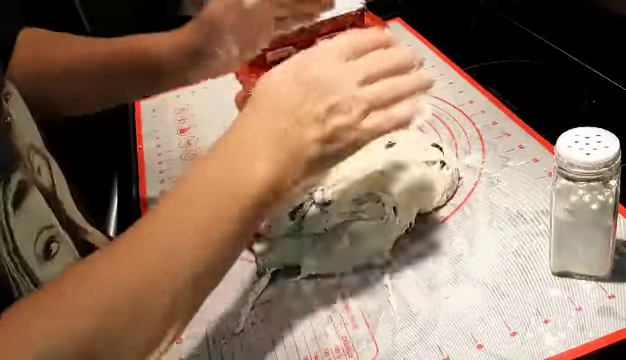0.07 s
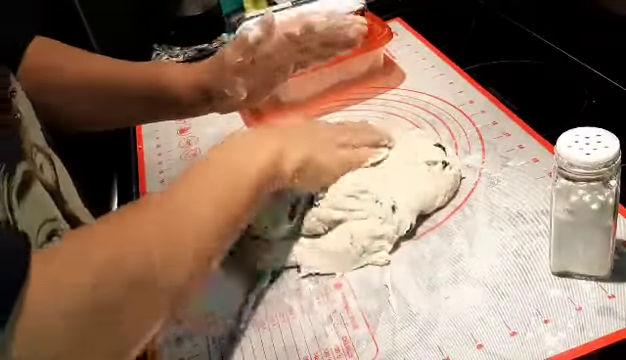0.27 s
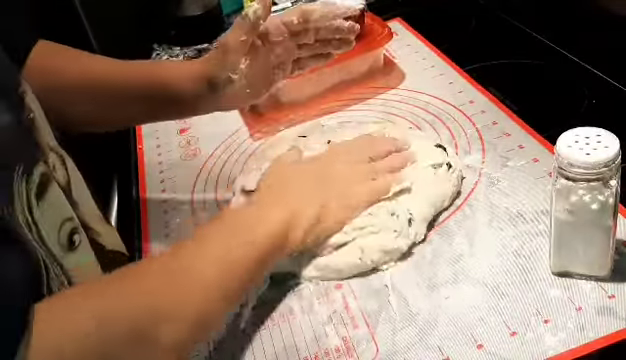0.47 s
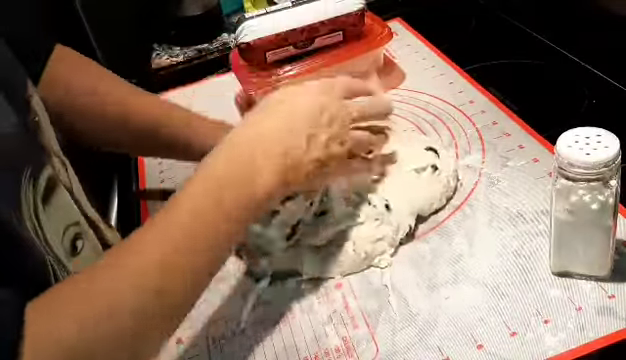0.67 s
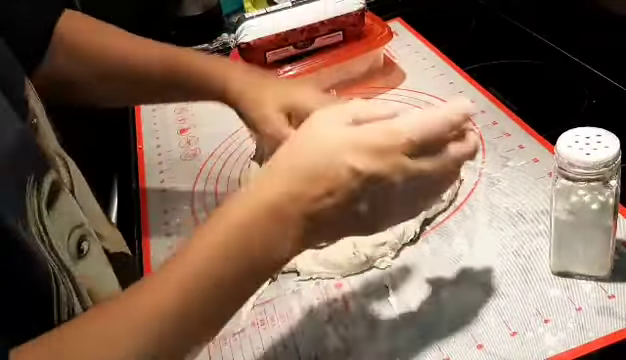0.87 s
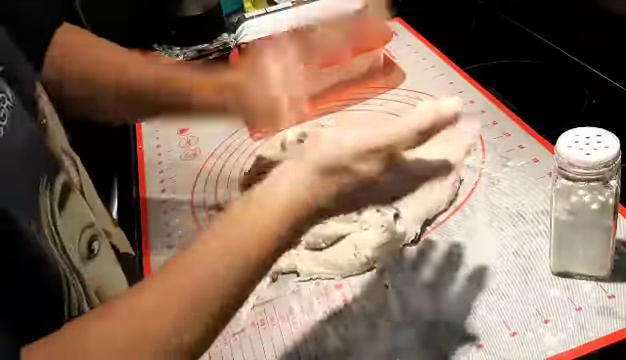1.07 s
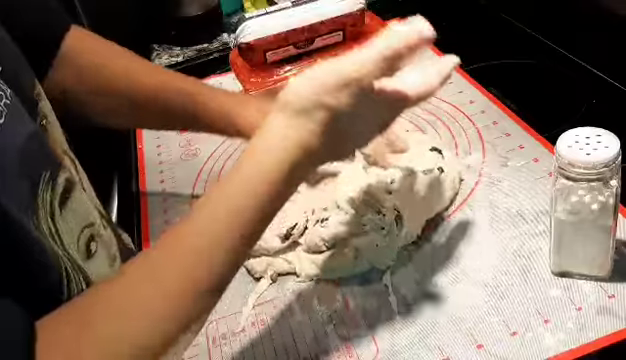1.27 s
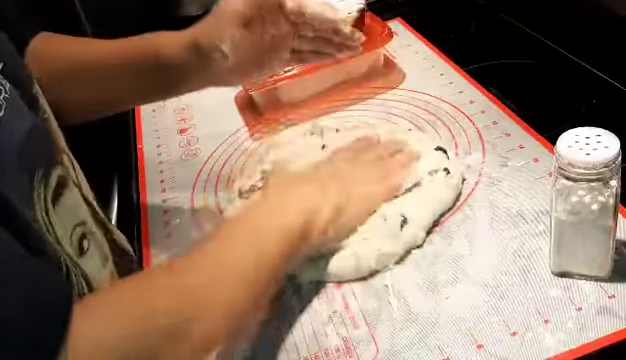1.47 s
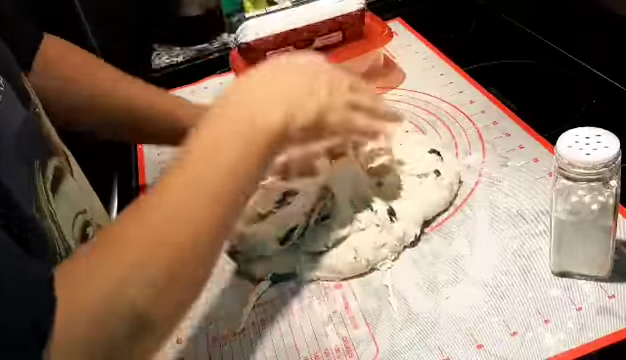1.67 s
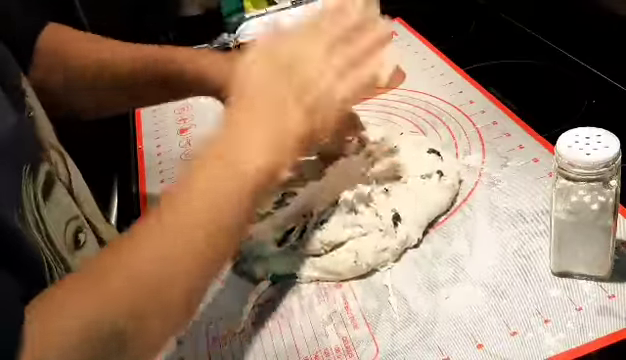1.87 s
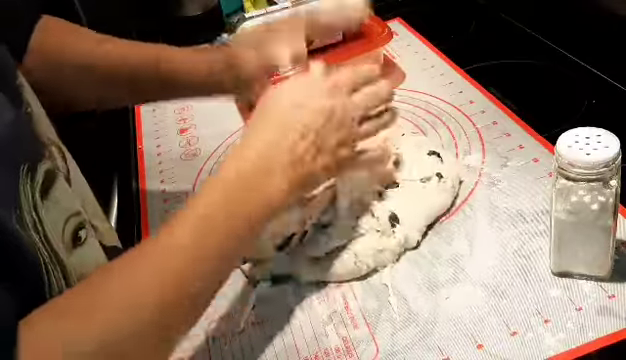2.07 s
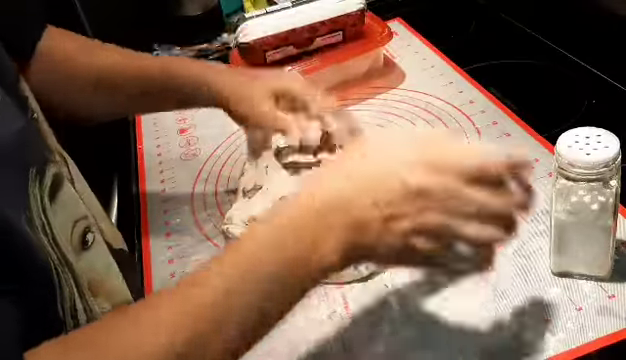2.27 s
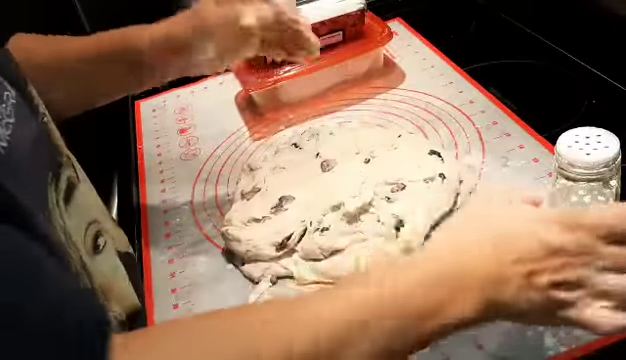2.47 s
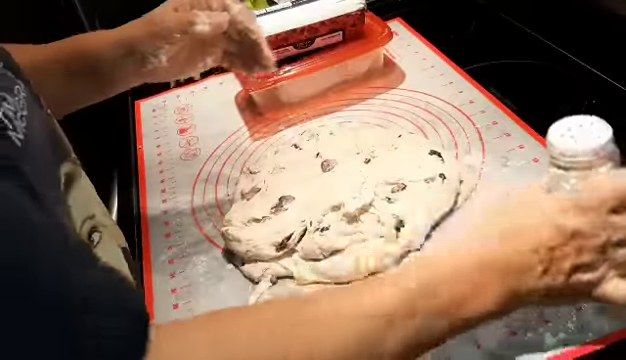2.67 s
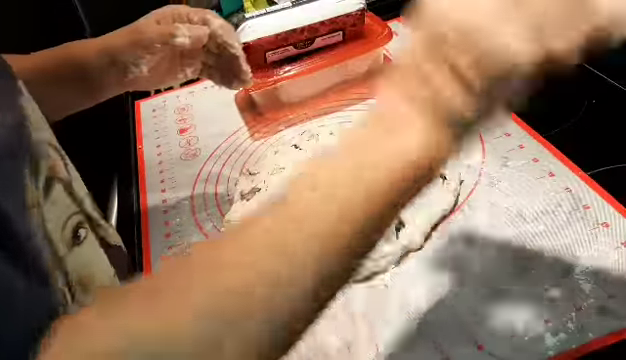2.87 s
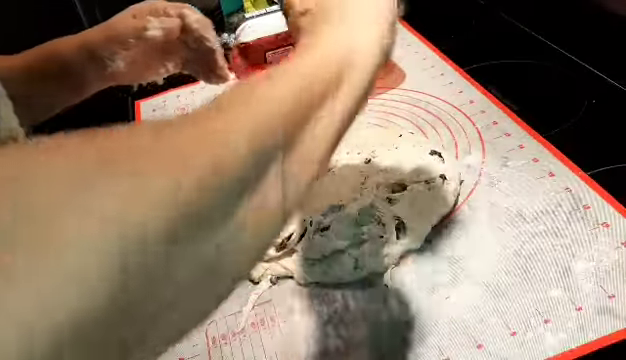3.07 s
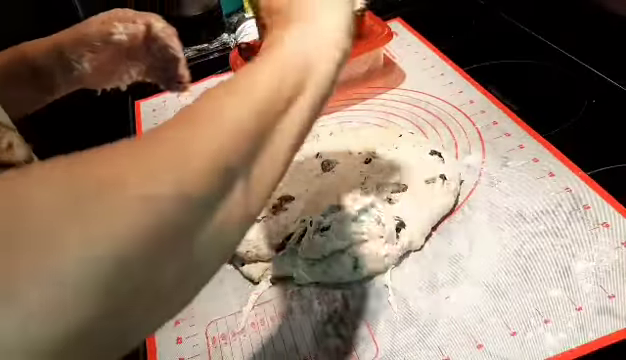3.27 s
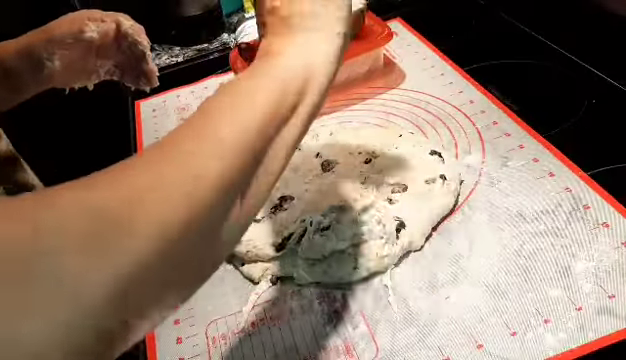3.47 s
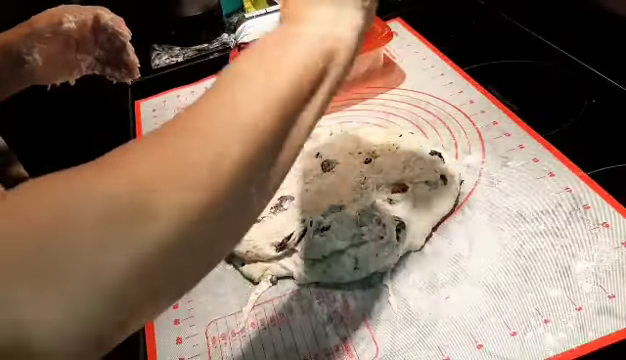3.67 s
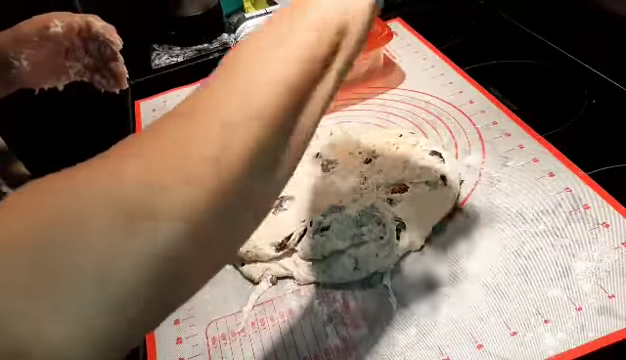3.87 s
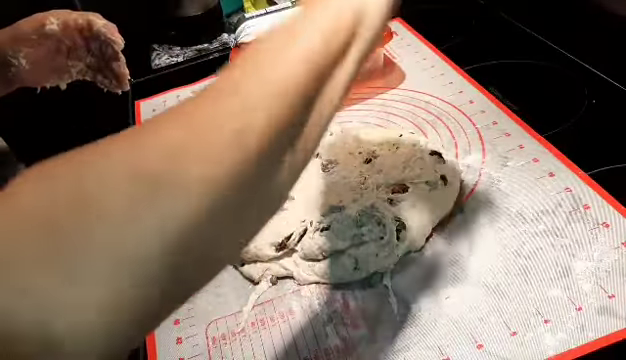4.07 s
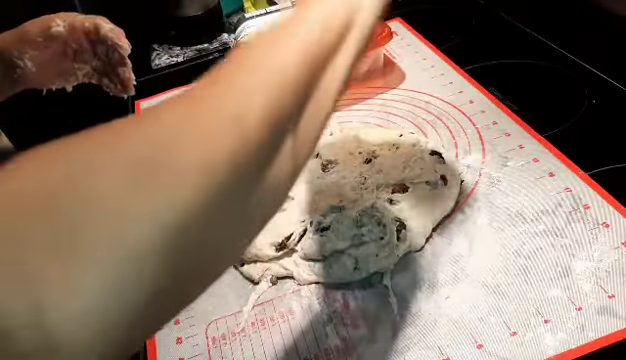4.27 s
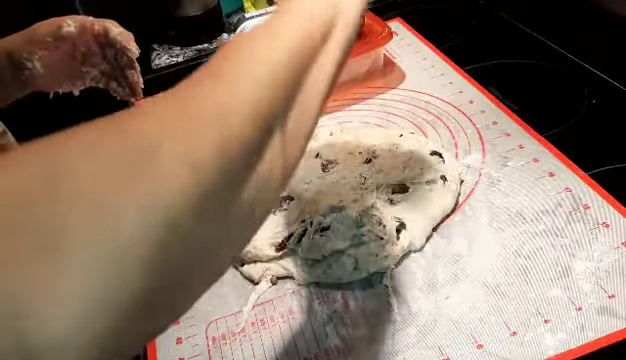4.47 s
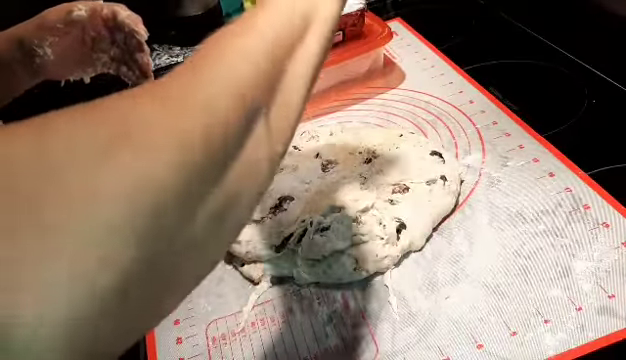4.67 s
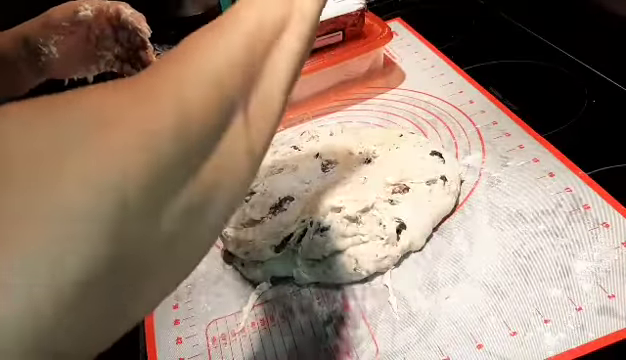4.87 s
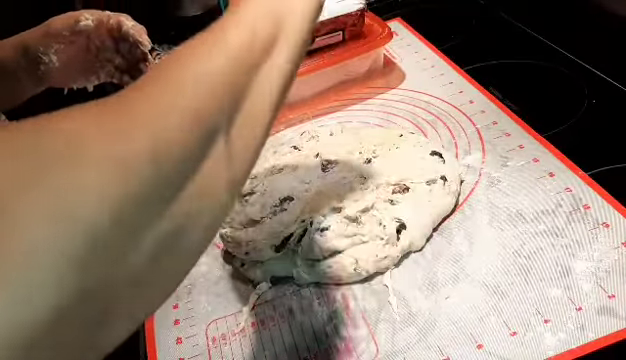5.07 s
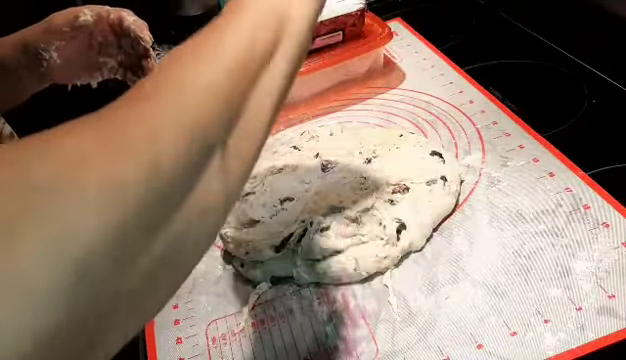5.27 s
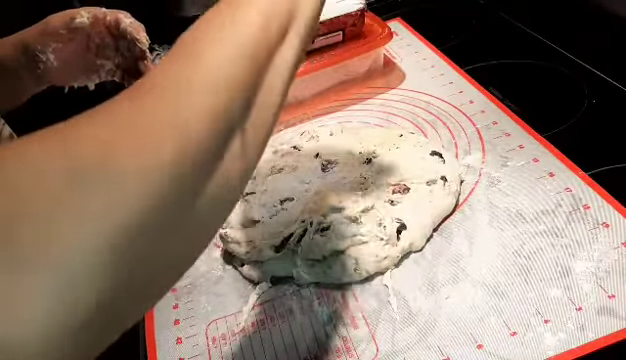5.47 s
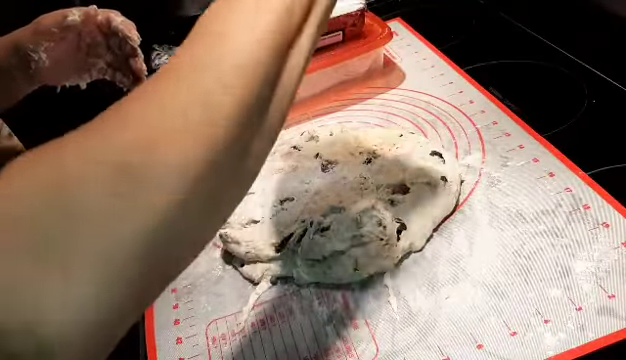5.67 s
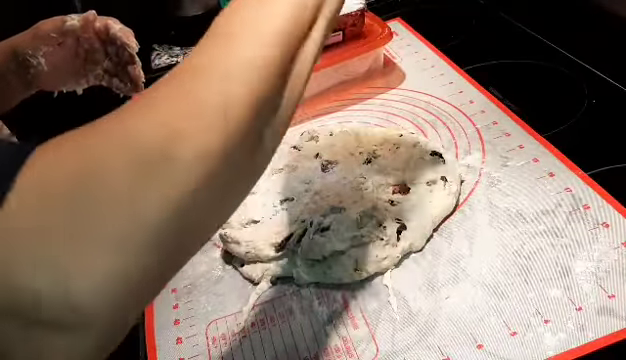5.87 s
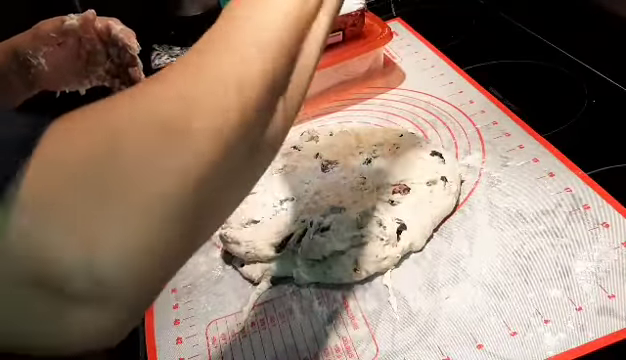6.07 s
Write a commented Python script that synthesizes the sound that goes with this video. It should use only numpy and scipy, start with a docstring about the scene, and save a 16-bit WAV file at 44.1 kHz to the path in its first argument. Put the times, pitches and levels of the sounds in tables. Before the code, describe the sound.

Nine soft, fleshy dough pats over a kitchen counter give way to sparse dull knocks and tiny dry puffs, against running water and low motor hum.

```python
"""Floured hands pat soft dough on a kitchen counter: noise bursts for fingers and air, over ringing sines.
Dull knocks on the counter come before, among and after the pats; short dry puffs of narrow noise come
later, as a jar is handled. Behind them a tap hisses into a sink as shaped noise, and an appliance hums
with wavering sines over a rumble. Sparse echoes give the kitchen; level and likeness between the sides
give a spaced pair of microphones."""
import sys
import numpy as np
from scipy import signal
from scipy.io import wavfile
from scipy.ndimage import uniform_filter1d

SR = 44100
rng = np.random.default_rng(int(sys.argv[2]) if len(sys.argv) > 2 else 0)


def transcribe(signal):
    """Save signal, clipped to [-1, 1], as a 16-bit WAV file at the path in sys.argv[1]."""
    frames = np.atleast_2d(signal).T
    limited = np.clip(frames, -1, 1)
    pcm = np.round(limited * 32767).astype(np.int16)
    wavfile.write(sys.argv[1], SR, pcm)


N = 269451  # length of the sound in samples
HANDS_PAN_DB = -2.5  # left minus right, for pats and knocks


def gain_of(db):
    """Turns decibels into a gain."""
    return 10 ** (np.asarray(db) / 20)


def evened(x):
    """Scales a signal to rms 1."""
    return x / np.sqrt(np.mean(x ** 2) + 1e-20)


def evened_at_start(x):
    """Scales a signal so that its first 25 ms have rms 1."""
    return x / np.sqrt(np.mean(x[..., :SR // 40] ** 2))


def sides(pan_db):
    """Left and right gains for a level difference, left minus right."""
    return gain_of(np.array([[.5], [-.5]]) * pan_db)


def read(points, hz):
    """Reads a table between its rows, on a log frequency axis."""
    f, value = np.transpose(points)
    return np.interp(np.log(hz + 1), np.log(f + 1), value)


def add(mix, s, sound):
    """Mixes a two-channel sound in at s seconds."""
    part = mix[:, round(s * SR):][:, :sound.shape[1]]
    part += sound[:, :part.shape[1]]


def wander(t, top_hz):
    """Slow chance: sines of random phase, the slowest strongest, with rms 1."""
    coarse = t[::64]
    drift = 0
    for f in np.geomspace(.2, top_hz, num=24):
        drift = drift + np.sin(2 * np.pi * (f * coarse + rng.random())) / np.sqrt(f)
    return np.interp(t, coarse, evened(drift))


def band(x, hz, width):
    """A broad resonance around hz; width is a share of hz."""
    b, a = signal.iirpeak(np.clip(hz, 100, SR / 2.5), 1 / width, SR)
    return signal.lfilter(b, a, x)


# How alike left and right are. Each row: frequency in Hz, likeness from 0 to 1.
LIKENESS = [(60, .995), (160, 0.63), (270, 0.88), (450, 1), (740, 0.13), (1500, 0.3), (5000, 0.054),
            (15000, 0.052)]
# Which side the background noise leans to. Each row: frequency in Hz, left minus right in dB.
LEAN = [(60, 0.5), (150, 1), (500, -0.2), (3000, -0.4), (15000, -0.7)]


def wide_noise(shape_db, lag, patchy_db):
    """Two-channel noise of rms 1 with drifting patches; shape_db gives the level of each frequency."""
    frames, hz = N // 512 + 5, np.fft.rfftfreq(2048, 1 / SR)
    a, b, c, d, patches = rng.standard_normal((frames, 1025, 5)).T
    # smooth the patches across frequency, then across time
    patches = uniform_filter1d(patches, size=16, axis=0)
    patches = evened(uniform_filter1d(patches, size=5, axis=1))
    same = np.clip(read(LIKENESS, hz), 0, 1)[:, None]
    right = a + 1j * b
    early = np.exp(2j * np.pi * hz * lag / SR)[:, None]  # the sound reaches the left microphone first
    left = same * early * right + np.sqrt(1 - same ** 2) * (c + 1j * d)
    left = left * gain_of(read(LEAN, hz))[:, None]
    spectrum = np.array([left, right]) * gain_of(shape_db(hz)[:, None] + patchy_db * patches)
    return evened(signal.istft(spectrum, nperseg=2048, noverlap=1536)[1][:, :N])


# Echo dying times. Each row: frequency in Hz, time to fall by 60 dB in seconds.
ECHO_TIMES = [(100, 0.84), (400, 0.52), (1500, 0.25), (4000, 0.15), (12000, 0.12)]
# Echo loudness. Each row: frequency in Hz, echo level in dB.
ECHO_LEVELS = [(100, -10.5), (300, -7.5), (1000, -3.5), (4000, -5.5), (12000, -9.5)]


def kitchen(x):
    """Sparse echoes of random sign, each band dying at its own speed, sides as alike as the table says."""
    taps = np.zeros((2, SR // 2))
    # one echo at a random place in every 20 samples
    at = np.arange(200, SR // 2 - 20, 20) + rng.integers(0, 20, (2, (SR // 2 - 201) // 20))
    np.put_along_axis(taps, at, rng.choice([-1., 1.], at.shape), 1)
    hz, t, z = signal.stft(taps, SR, nperseg=256)
    same = np.clip(read(LIKENESS, hz), 0, 1)[:, None]
    left = same * z[1] + np.sqrt(1 - same ** 2) * z[0]
    z = np.array([left, z[1]]) * gain_of(-60 * t / read(ECHO_TIMES, hz)[:, None])
    z /= np.linalg.norm(z, axis=2, keepdims=True)  # equal energy in every band
    coloured = z * gain_of(read(ECHO_LEVELS, hz))[:, None]
    flat, tail = signal.istft(np.array([z, coloured]), SR, nperseg=256)[1]
    return signal.fftconvolve(x[None], tail / np.linalg.norm(flat[0]), axes=1)[:, :N]


# The colour of the running water. Each row: frequency in Hz, relative level in dB per Hz.
HISS = [(280, -21), (400, -10), (700, -7.5), (950, -8), (1400, -15), (1820, -15), (2400, -12), (3500, -10),
        (4800, -9), (8100, -11.5), (8700, -15.5), (9900, -15.5), (10600, -12.5), (15600, -13.5)]
# Resonances of the sink. Each row: frequency in Hz, width in Hz, lift in dB.
SINK = [(486.5, 10.4, 12.5), (710.3, 6, 9), (1064, 14, 17), (1172.5, 14.3, 23.5), (1520, 220, 9),
        (2028, 56, 11), (2750, 90, 1), (4040, 35, 5), (4140, 14, 11.5), (5003, 32, 10), (6200, 24, 10.5),
        (7870, 53, 7)]
TAP_DB, RIGHT_LAG = -37.5, 18  # rms level before the hush; delay of the right side in samples


def tap():
    """Water hiss, lifted at the resonances of the sink, with a fine flicker of spray."""
    t = np.arange(N) / SR

    def colour(hz):
        """The hiss plus one rounded peak for each resonance."""
        return read(HISS, hz) + sum(db / (1 + (2 * (hz - f) / w) ** 2) for f, w, db in SINK)

    flicker = 0.1 * wander(t, 41)  # dB
    return gain_of(TAP_DB + flicker) * wide_noise(colour, RIGHT_LAG, patchy_db=1.69)


# The low rumble. Each row: frequency in Hz, relative level in dB per Hz.
RUMBLE = [(12, -36), (20, -6), (49, -7.5), (86, 0), (118, -7), (138, -15), (163, -16.5), (271, 2.5),
          (293, 0), (351, -23.5), (405, -25), (450, -4), (580, -26), (990, -120)]
RUMBLE_DB = -47.5  # rms level before the hush
# The motor lines. Each row: frequency in Hz, rms level in dB before wavering and hush, left minus right in dB.
HUM = [(56.1, -49.5, -2), (120.5, -51.5, -4), (157.2, -65, -12), (200, -59.5, -4), (232.6, -66, 2)]


def appliance():
    """Motor lines that waver in level and pitch, over a lumpy low rumble."""
    t = np.arange(N) / SR
    lines = np.zeros((2, N))
    for hz, db, pan_db in HUM:
        turn = 2 * np.pi * (hz * t + rng.random()) + 0.44 * wander(t, 1.17)
        level = np.sqrt(2) * gain_of(db + 1.5 * wander(t, 6.7))
        lines += level * sides(pan_db) * np.sin(turn)
    rumble = wide_noise(lambda hz: read(RUMBLE, hz), 0, patchy_db=-1.0)
    return lines + gain_of(RUMBLE_DB) * rumble


# Short dry puffs while the jar is handled.
# Each row: start in seconds, level in dB, centre in Hz, time to swell to the peak in seconds.
PUFFS = [(2.6031, -37, 7100, 0.0042), (3.142, -35.5, 11100, 0.0048), (4.171, -35.5, 4140, 0.0063),
         (5.822, -41.5, 1710, 0.012)]


def puff(db, hz, length):
    """A brief swell of narrow noise, different on each side."""
    u = np.arange(SR // 10) / SR / length
    noise = evened(band(rng.standard_normal((2, len(u))), hz, 0.3))
    return gain_of(db) * noise * u * np.exp(1 - u)


def ring(modes, rise, pitch, length):
    """Dying sines, each a little detuned at each blow, swelling over rise seconds; rms 1 at the start."""
    t = np.arange(SR // 2) / SR
    hz, db, t60 = np.transpose(modes)[:, :, None]
    hz = pitch * hz * (1 + 0.022 * rng.standard_normal(hz.shape))
    tones = gain_of(db - 60 * t / (t60 * length)) * np.sin(2 * np.pi * hz * t)
    return evened_at_start(tones.sum(0) * (1 - np.exp(-(t / rise) ** 2)))


# What the counter and the dough ring with, before each blow tunes the pitch and scales the ring length.
# Each row: frequency in Hz, relative level in dB, time to fall by 60 dB in seconds.
BOOM = [(57, -9, 0.13), (74.3, 13, 0.27), (93.84, 18, 0.36), (105.7, 7.5, 0.18)]
THUD = [(167, -18.5, 0.32), (210, -3.5, 0.26), (249, -4, 0.18), (266.5, -0.5, 0.11), (360.4, -6.5, 0.14)]
# The hollow's ring. Each row: multiple of its pitch, relative level in dB, time to fall by 60 dB in
# seconds before the ring length scales it.
HOLLOW = [(.73, -9, 0.12), (1, 10.5, 0.026), (1.09, -16.5, 0.15), (1.36, -15, 0.063)]


def blow(boom_db, thud_db, hollow_db, hollow_hz, length, contact):
    """Counter, dough and hollow ring together; the heavy counter swells slowest."""
    boom = gain_of(boom_db) * ring(BOOM, contact + 0.011, 0.94, length)
    thud = gain_of(thud_db) * ring(THUD, contact + 0.00053, 0.93, length)
    hollow = gain_of(hollow_db) * ring(HOLLOW, contact + 0.001, hollow_hz, length)
    return boom + thud + hollow


# Dull knocks on the counter; the first row is the tail of a pat already sounding at the start;
# the loudest is the jar.
# Each row: start in seconds, counter boom in dB, thud in dB, hollow in dB, pitch of the hollow in Hz.
KNOCKS = [(.0031, -47, -49, -45.5, 503), (0.0328, -45, -39.5, -52, 405), (.8411, -60, -54, -40, 677),
          (2.61, -61, -48, -51, 596), (2.7025, -38.5, -26, -32.5, 546), (3.7842, -47, -42, -65, 403),
          (4.7772, -59, -46, -48, 413), (4.9792, -60, -42.5, -50, 410)]
KNOCK_RING, KNOCK_CONTACT_S = 0.73, 0.00038  # share of the full ring length; contact time


def knock(boom_db, thud_db, hollow_db, hollow_hz):
    """A short contact that sets off the ringing without any finger noise."""
    body = blow(boom_db, thud_db, hollow_db, hollow_hz, KNOCK_RING, KNOCK_CONTACT_S)
    return sides(HANDS_PAN_DB) * body


# The pats of the hands on the dough.
# Each row: firmest contact in seconds, counter boom in dB, dough thud in dB, cupped palm in dB,
# palm pitch in Hz, smack in dB, smack centre in Hz, fizz in dB, landing time of the fingers in seconds,
# share of the full ring length.
PATS = [(0.2649, -37, -41.5, -37.5, 480, -32, 2250, -36.5, 0.0043, 0.87),
        (0.5635, -28.5, -25, -29.5, 587, -22.5, 3440, -30, 0.0058, 0.74),
        (0.7941, -40.5, -33, -37.5, 580, -37, 2300, -39, 0.0015, 1.1),
        (1.2174, -22.5, -22, -21, 603, -31.5, 3970, -28.5, 0.0021, 0.93),
        (1.5506, -28, -29.5, -39.5, 465, -33, 2520, -29.5, 0.0034, 0.77),
        (1.795, -31, -40, -42, 618, -37.5, 1490, -58, 0.0063, 0.78),
        (2.0403, -35, -39, -43.5, 548, -43, 1850, -57, .0045, 0.45),
        (2.0534, -57, -35, -45, 473, -40.5, 2890, -59, 0.0031, 0.65),
        (2.2389, -32.5, -31.5, -36.5, 653, -32, 1540, -53, 0.0043, 0.58)]
SMACK_CYCLES = 15.3  # the rush dies to about a third in this many cycles of the smack
AIR_DB, AIR_HZ, AIR_S = -8.5, 4000, 0.048  # squeezed air: level against the palm, centre, dying time


def pat(s, boom_db, thud_db, palm_db, palm_hz, smack_db, smack_hz, fizz_db, landing, length):
    """Fingers land in a grainy rush of noise, air squirts out, and the body rings under it."""
    t = np.arange(SR // 2) / SR - 2 * landing  # zero at the firmest contact
    before = -abs(1.73 * t / landing) ** 1.33
    after = -(abs(t) * smack_hz / SMACK_CYCLES) ** 0.99
    rush = np.exp(np.where(t < 0, before, after))
    squirt = np.where(t < 0, rush, np.exp(-t / AIR_S))
    grain_db = 2.2 * evened(uniform_filter1d(rng.standard_normal(len(t)), size=30))
    grit = rng.standard_normal((3, len(t))) * gain_of(grain_db) * signal.windows.tukey(len(t), .004)
    grit = 0.39 * grit[0] + grit[1:]  # a shared part plus a different part at each microphone
    smack = gain_of(smack_db) * evened_at_start(band(grit * rush, smack_hz, 0.98))
    fizz = gain_of(fizz_db) * evened_at_start(band(grit * rush, 7000, 3.1))
    swapped = grit[::-1]  # left and right trade places
    air = gain_of(palm_db + AIR_DB) * evened_at_start(band(swapped * squirt, AIR_HZ, 0.62))
    body = blow(boom_db, thud_db, palm_db, palm_hz, length, landing)
    body = np.roll(body, round(landing * SR))  # starts one landing time before the firmest contact
    return s - 2 * landing, sides(HANDS_PAN_DB) * (smack + fizz + air + body)


HUSH_DB, HUSH_ENDS_S, HUSH_FADE_S = -2.5, 2.19, 0.64  # tap and appliance start lower, then rise


def scene():
    """Hands and jar with their echoes, over the tap and the appliance."""
    hands = np.zeros((2, N))
    for row in PATS:
        add(hands, *pat(*row))
    for s, *row in KNOCKS:
        add(hands, s, knock(*row))
    for s, *row in PUFFS:
        add(hands, s, puff(*row))
    hush = np.clip(1 - (np.arange(N) / SR - HUSH_ENDS_S) / HUSH_FADE_S, 0, 1)
    background = gain_of(HUSH_DB * hush) * (tap() + appliance())
    return hands + kitchen(hands.mean(0)) + background


def record(dry):
    """Small microphones lose the deepest bass; a steep filter then cuts the highest treble."""
    thin = signal.sosfilt(signal.butter(2, 35, "high", fs=SR, output="sos"), dry)
    treble_cut = signal.firwin(1023, 15520, window=("kaiser", 9), fs=SR)  # edge in Hz
    return signal.oaconvolve(thin, treble_cut[None], "same")


dry = scene()
out = record(dry)
transcribe(out)
```